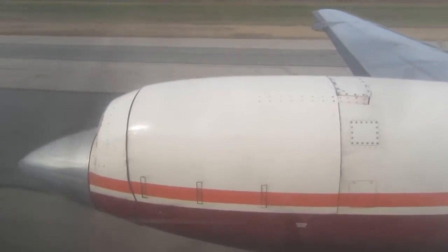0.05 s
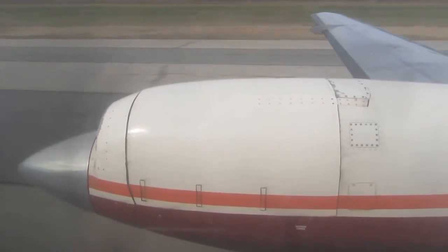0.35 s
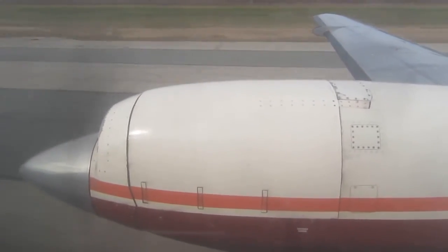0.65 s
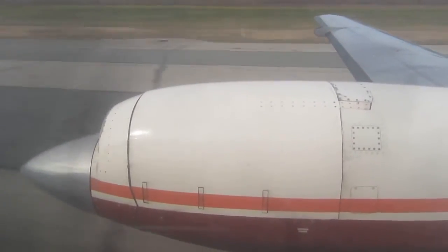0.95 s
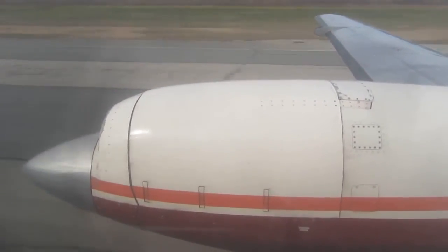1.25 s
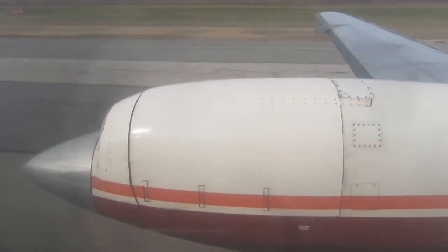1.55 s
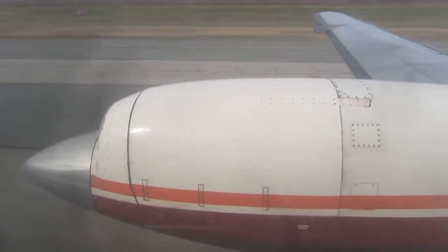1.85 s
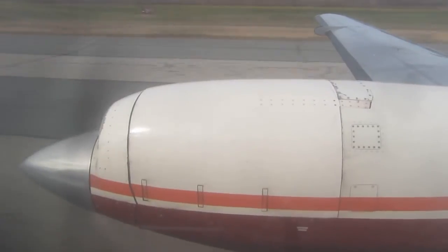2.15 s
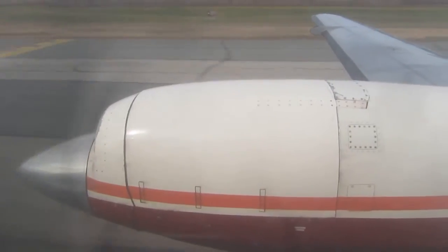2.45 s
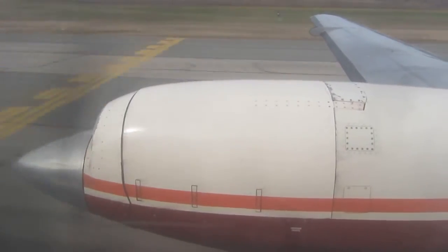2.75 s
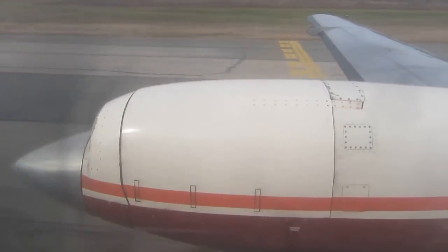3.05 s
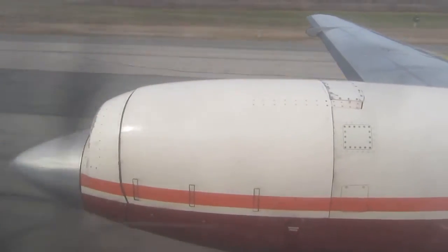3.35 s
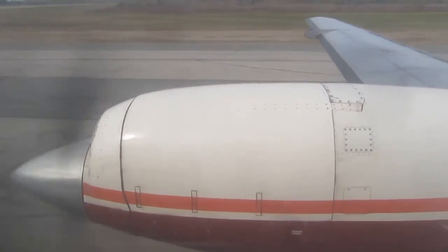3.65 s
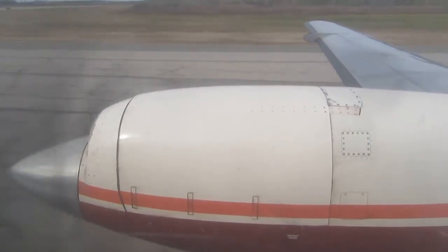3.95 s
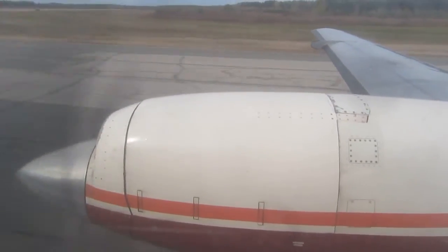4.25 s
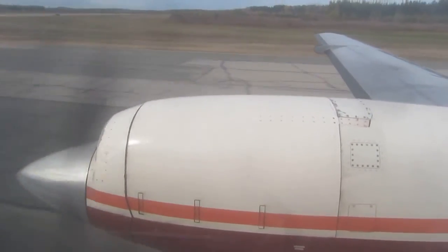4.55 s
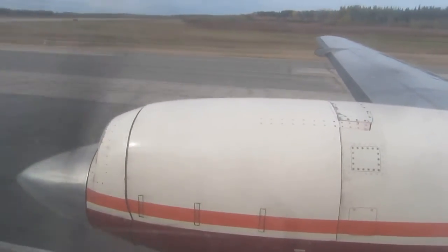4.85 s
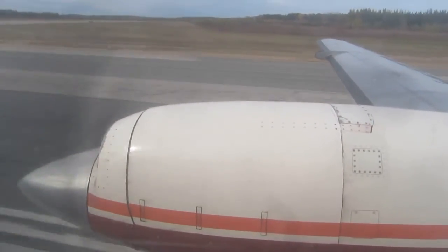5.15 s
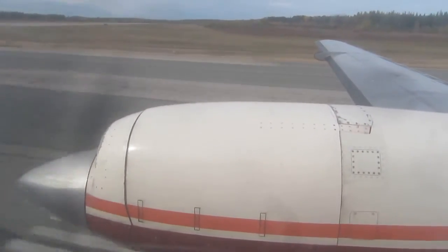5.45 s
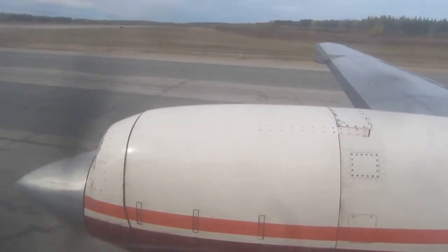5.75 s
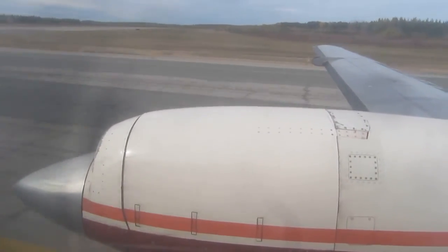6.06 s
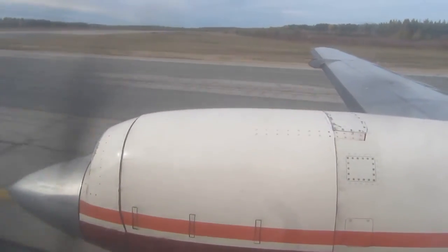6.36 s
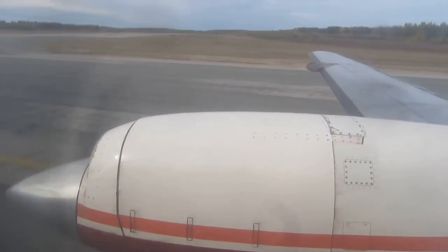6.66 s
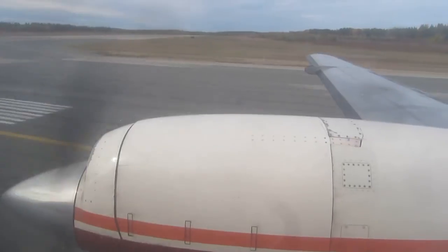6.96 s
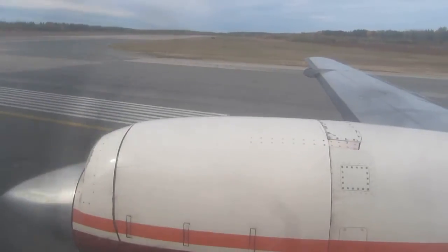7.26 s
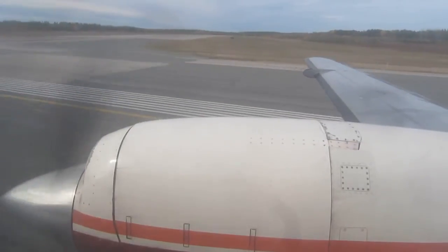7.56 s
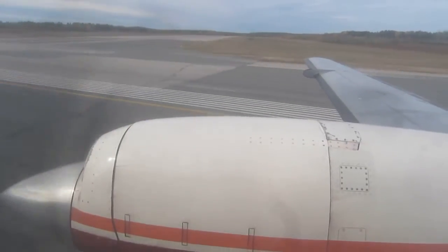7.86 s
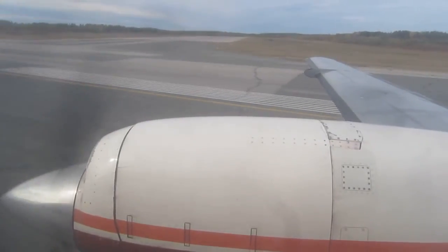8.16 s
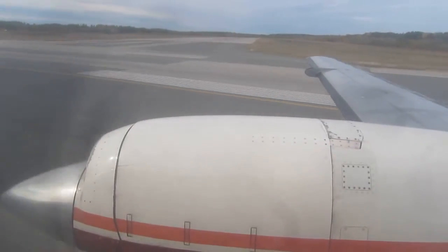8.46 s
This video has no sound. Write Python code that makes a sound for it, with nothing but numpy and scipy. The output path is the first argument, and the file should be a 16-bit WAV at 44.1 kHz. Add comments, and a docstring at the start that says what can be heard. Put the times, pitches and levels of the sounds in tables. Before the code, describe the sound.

Inside the cabin of a turboprop plane rolling along a runway, two propellers hold a loud, low drone over steady cabin air. After about a second they slow, sliding down in pitch and throbbing against each other while a faint high whine sinks away. A rough roar of propeller wash, a hiss at the window and tyre rumble build up and carry on. The microphone sits nearer one propeller.

```python
"""Two propellers drone, heard from inside the cabin of a turboprop rolling along a runway.
They slow from about 102 to 75 blade passes a second, beat and slide through the cabin's modes.
As they slow the air turns turbulent: their wash roars on the fuselage and air hisses at the window
seal, over rumbling tyres and steady cabin air. A faint turbine whine sinks as the engines wind down.
The microphone has two ports and sits nearer to one propeller."""
import sys
import numpy as np
from scipy import signal
from scipy.fft import rfft, irfft, next_fast_len
from scipy.io import wavfile

SR = 44100
rng = np.random.default_rng(int(sys.argv[2]) if len(sys.argv) > 2 else 0)


def transcribe(u):
    """Save the signal u as a 16-bit wav file named by the first command-line argument.

    u: samples, shape (n,) or (channels, n), limited to [-1, 1]; the rate is SR.
    q: integer samples, one column per channel.
    """
    v = np.clip(np.atleast_2d(u).T, -1, 1)
    q = np.round(v * 32767).astype(np.int16)
    wavfile.write(sys.argv[1], SR, q)


N = 380141
T = np.arange(N) / SR


def gain_of(db):
    """Decibels to a factor."""
    return 10 ** (np.asarray(db) / 20)


def unit_rms(x):
    """Scales to an rms of 1."""
    return x / np.sqrt(np.mean(abs(x) ** 2) + 1e-30)


def follow(rows):
    """Each column of a time curve at every sample."""
    times, *columns = np.transpose(rows)
    return np.array([np.interp(T, times, column) for column in columns])


def spectrum_at(points, hz):
    """A spectrum's values at the given frequencies, joined on a log axis."""
    knots_hz, values = np.transpose(points)
    return np.interp(np.log(hz + 1), np.log(knots_hz + 1), values)


def lift(modes, hz):
    """The dB that a set of resonances adds at each frequency."""
    return sum(db / (1 + (2 * (hz - centre) / width) ** 2) for centre, width, db in modes)


def noise(shape, modes=()):
    """Two unrelated noises of unit rms, coloured by a spectrum and its resonances."""
    size = next_fast_len(N)
    hz = np.fft.rfftfreq(size, 1 / SR)
    white = rfft(rng.standard_normal((2, size)))
    colour = gain_of(spectrum_at(shape, hz) + lift(modes, hz))
    return unit_rms(irfft(white * colour, size)[:, :N])


def flutter(width_hz, size=32768):
    """Two unrelated complex envelopes that wander within the given bandwidth."""
    hz = np.fft.fftfreq(size, N / SR / size)
    white = rng.standard_normal((2, size)) + 1j * rng.standard_normal((2, size))
    slow = unit_rms(np.fft.ifft(white / (1 + (hz / width_hz) ** 2)))
    return np.array([np.interp(T, np.linspace(0, T[-1], size), envelope) for envelope in slow])


def waver(width_hz):
    """One slow random wobble of unit rms."""
    return unit_rms(flutter(width_hz)[0].real)


def fuzzy_tone(cycles, width_hz):
    """Two narrow bands of noise that ride on one pitch, its phase given in cycles."""
    return np.sqrt(2) * (flutter(width_hz) * np.exp(2j * np.pi * cycles)).real


def blade_rates():
    """Blade passes a second of the near and the far propeller."""
    # the near propeller slowing: (time [s], blade rate [Hz])
    blade_rate = [(0, 101.9), (0.55, 102.4), (1.1, 100.45), (1.87, 91.8), (2.46, 87.24), (3.87, 77.96),
                  (4.5, 74.54), (4.87, 73.95), (6.08, 74.78), (8.62, 74.97)]
    # the far one's excess, which sets the beat: (time [s], extra blade rate [Hz])
    slip = [(0.0, -0.23), (1.1, 0.28), (1.8, 0.63), (2.6, 1.16), (3.7, 1.48), (4.45, 2.08), (6.0, 1.24),
            (8.62, 1.11)]
    near_hz = follow(blade_rate)[0]
    return np.array([near_hz, near_hz + follow(slip)[0]])


def turbulence(onset_s=2.32, growth=0.43):
    """The air around the slowing blades breaks up, quickly at first: 0 is calm, 1 fully stirred."""
    return np.clip((T - onset_s) / (T[-1] - onset_s), 0, 1) ** growth


def propellers(near, far, waver_db=0.7, waver_hz=8.0):
    """The blade harmonics of both propellers beat, and swell as they slide through the cabin's modes."""
    # blade harmonics 1-3 before the modes lift them: (near level [dB], far level [dB])
    harmonics = [(-34.5, -44.5), (-28, -40), (-37.5, -38.5)]
    # for each harmonic, the far wall pushes the cabin air with (+1) or against (-1) the near wall
    far_signs = (-1, -1, 1)
    # cabin modes that each propeller drives: (frequency [Hz], width [Hz], lift [dB])
    near_modes = [(103.05, 8.3, 14.5), (90.3, 22, 7), (200.8, 6.7, 7), (185.4, 7, 6.5), (255.8, 44.4, 14.8),
                  (307.9, 5.5, 13)]
    far_modes = [(85, 11.9, 9), (153.8, 25, 12.9), (176.3, 14, 9.3), (243.7, 21.6, 10.5),
                 (274.8, 27.5, 11.7)]
    near_hz, far_hz = blade_rates()
    drone = np.zeros(N)
    for k, ((near_db, far_db), sign) in enumerate(zip(harmonics, far_signs), 1):
        drone += gain_of(near_db + lift(near_modes, k * near_hz)) * np.sin(2 * np.pi * k * near)
        drone += sign * gain_of(far_db + lift(far_modes, k * far_hz)) * np.sin(2 * np.pi * k * far)
    return np.sqrt(2) * drone * gain_of(waver_db * waver(waver_hz))


def chopping(near, far, eddy_share=0.96, width_hz=12.2, calm_db=-10.0, stirred_db=1.3, growth=1.73):
    """Blades slice swirling eddies: fuzzy humps at multiples of a rate just under the blade rate."""
    # humps of the sliced eddies: (multiple of the eddy rate, relative level [dB])
    humps = [(4, -29.5), (5, -28), (6, -31), (7, -28), (8, -30.5), (10, -37.5), (11, -33), (12, -39),
             (13, -48), (14, -43.5), (17, -56)]
    eddy_cycles = eddy_share * (near + far) / 2
    chop = sum(gain_of(db) * fuzzy_tone(k * eddy_cycles, width_hz) for k, db in humps)
    return chop * np.interp(turbulence() ** growth, [0, 1], gain_of([calm_db, stirred_db]))


def panel_buzz(near, mode_hz=756.0, mode_width_hz=73.0, level_db=-38.5, blur_hz=11.0):
    """The near propeller's upper harmonics sing as they slide into a panel resonance."""
    near_hz = blade_rates()[0]
    buzz = np.zeros((2, N))
    for k in range(7, 11):
        response = 1 / np.sqrt(1 + (2 * (k * near_hz - mode_hz) / mode_width_hz) ** 2)
        buzz += response * fuzzy_tone(k * near, blur_hz)
    return buzz * gain_of(level_db) * (near_hz / near_hz.max()) ** 2


def tyres():
    """Runway rumble comes up through the airframe, lifted by the cabin's boom."""
    # the rumble as heard in the cabin: (frequency [Hz], relative level [dB])
    rumble = [(10, -23.5), (22, 0), (35, -0.5), (54, -6), (70, 4), (120, 13), (190, 10), (300, 6.5),
              (600, 1), (1500, -55)]
    # its strength along the runway: (time [s], level [dB])
    rolling = [(0, -34.5), (2.4, -31.5), (3.6, -25), (5.5, -25.5), (8.62, -24)]
    return noise(rumble) * gain_of(follow(rolling))


def wash(near, level_db=-22.5, stir_db=1.57, pulsing=0.078, buffet_db=0.52, buffet_hz=13.0):
    """Propeller wash buffets the fuselage panels from outside, a little harder at each blade pass."""
    # the wash through the cabin wall: (frequency [Hz], relative level [dB])
    roar = [(30, -40.5), (70, -13), (150, -8.5), (270, -2), (380, 1), (470, -3.5), (640, -2), (735, -1.5),
            (880, -6.5), (1090, -12.5), (1240, -15), (1620, -26), (2000, -31), (2500, -60.5)]
    # fuselage panel resonances: (frequency [Hz], width [Hz], lift [dB])
    panels = [(708, 31, 3.5), (866, 32, 5), (950, 20, 2.5), (1026, 38, 2), (1088, 46, 5), (1252, 25, -1),
              (1435, 60, 3.5), (1802, 46, 8.5), (1950, 50, 3.5)]
    air = noise(roar, panels)
    pulse = 1 + pulsing * np.cos(2 * np.pi * near)
    return air * pulse * gain_of(level_db + stir_db * turbulence() + buffet_db * waver(buffet_hz))


def vent_hiss(level_db=-49.5):
    """A steady rush of cabin air around the microphone."""
    # the cabin air: (frequency [Hz], relative level [dB])
    vent = [(800, -11), (2300, 0.5), (4100, 0.5), (4700, -7.5), (5500, -13), (6500, -2), (7400, -5),
            (8600, -11.5), (10500, -17), (12000, -31), (13200, -20.5), (15700, -19.5)]
    return noise(vent) * gain_of(level_db)


def turbines(width_hz=480.0, second_ratio=0.93, second_gain=0.7):
    """Two blurred compressor whines emerge, sink and fade as the engines wind down."""
    # the upper whine: (time [s], frequency [Hz], level [dB])
    whine = [(0, 11760, -82), (1, 11660, -82.5), (1.6, 11000, -69), (2.6, 9840, -69.5), (4.5, 8500, -82)]
    hz, db = follow(whine)
    cycles = np.cumsum(hz) / SR
    upper = fuzzy_tone(cycles, width_hz)
    lower = fuzzy_tone(second_ratio * cycles, width_hz)
    return gain_of(db) * (upper + second_gain * lower)


def whistles():
    """Faint whistles swell and fade once as the engines begin to slow."""
    # narrow noise bands: (peak time [s], spread [s], frequency [Hz], width [Hz], level [dB])
    bands = [(1.4, 0.37, 7300, 200, -60), (1.64, .22, 730, 10, -28.5)]
    return sum(fuzzy_tone(hz * T, width) * gain_of(db) * np.exp(-((T - peak_s) / spread) ** 2)
               for peak_s, spread, hz, width, db in bands)


def seal_hiss(near, level_db=-41.0, pulsing=0.23, gust_db=1.0, gust_hz=15.0):
    """Turbulent air leaks through a ringing gap at the window, in blade-rate puffs and quick gusts."""
    # the leaking air: (frequency [Hz], relative level [dB])
    hiss = [(800, -19.5), (2000, 0), (2500, -3), (4000, -1), (4600, -4), (5100, -7.5), (5700, -7.5),
            (6500, 1.5), (7500, -1.5), (8600, -10.5), (10500, -17.5), (12000, -41), (13200, -19.5),
            (15700, -19)]
    # resonances of the seal gap and window: (frequency [Hz], width [Hz], lift [dB])
    seal = [(2777, 64, 8), (3110, 50, 2), (3130, 65, 6), (3667, 91, 11), (3920, 40, 10.5), (4080, 38, 3.5),
            (5300, 120, -7), (6040, 90, 10.5), (6670, 110, 7), (6820, 60, 3), (7440, 85, 6.5)]
    air = noise(hiss, seal)
    pulse = 1 + pulsing * np.cos(2 * np.pi * near)
    return air * pulse * turbulence() * gain_of(level_db + gust_db * waver(gust_hz))


def surge(at_s=3.84, spread_s=0.055, lift_db=2.0):
    """One brief gust lifts the rush of air; returns a gain."""
    return gain_of(lift_db * np.exp(-((T - at_s) / spread_s) ** 2))


def microphone(shared, apart):
    """Two ports in the cabin hear alike in the bass and less so in the treble."""
    # how alike the ports hear: (frequency [Hz], coherence [0-1])
    likeness = [(25, .96), (70, .99), (160, .98), (270, .92), (500, .75), (1000, .67), (2000, .4),
                (4000, .45), (8000, .2), (15000, .1)]
    # how far the left port leads: (frequency [Hz], phase [rad])
    lead = [(0, 1.8), (160, 0.15), (270, 0.15), (740, 0.45), (1200, 1.97), (2100, 0.5), (3100, 2.15),
            (5200, 3.8), (6700, 1.9), (8000, 0.3), (11000, 3), (15000, 0.5)]
    # balance of the ports: (frequency [Hz], left over right [dB])
    balance = [(30, -3.5), (95, -3), (160, -1), (240, -3.5), (380, -2), (700, -5), (1290, 0), (2380, -2.5),
               (4400, 1.5), (8120, 2), (15000, -.5)]
    size = next_fast_len(N + 2048)
    hz = np.fft.rfftfreq(size, 1 / SR)
    coherence = spectrum_at(likeness, hz)
    left = rfft(shared, size)
    right = coherence * left + np.sqrt(1 - coherence ** 2) * rfft(apart, size)
    right *= np.exp(-1j * spectrum_at(lead, hz))
    lean = gain_of(spectrum_at(balance, hz) / 2)
    return irfft(np.array([left * lean, right / lean]), size)[:, :N]


def scene():
    """Drone, roar and hiss meet at the microphone in the cabin."""
    near, far = np.cumsum(blade_rates(), axis=1) / SR  # blade passes so far
    roar = chopping(near, far) + panel_buzz(near) + tyres()
    rush = (wash(near) + seal_hiss(near)) * surge()
    diffuse = roar + rush + vent_hiss() + turbines() + whistles()
    shared = diffuse[0] + propellers(near, far)
    soft_ends = signal.windows.tukey(N, 0.0006)
    return microphone(soft_ends * shared, soft_ends * diffuse[1])


def record(dry):
    """The recorder's band limit cuts the top of the treble."""
    edge_hz = 15780
    low_pass = signal.firwin(1023, edge_hz, window=("kaiser", 9), fs=SR)
    return signal.oaconvolve(dry, low_pass[None], "same", axes=1)


dry = scene()
out = record(dry)
transcribe(out)
```